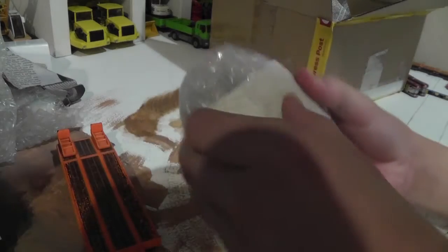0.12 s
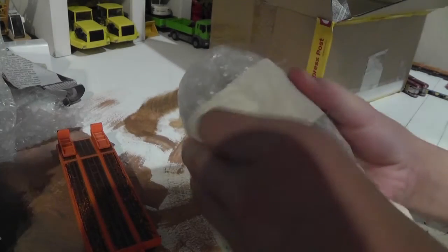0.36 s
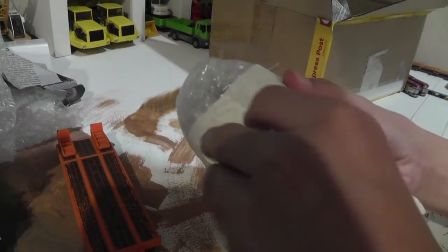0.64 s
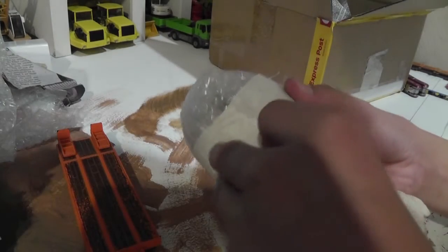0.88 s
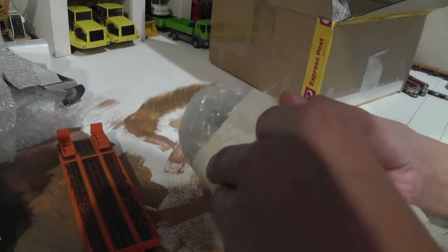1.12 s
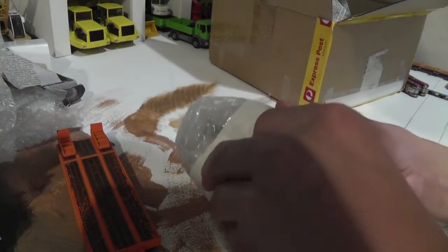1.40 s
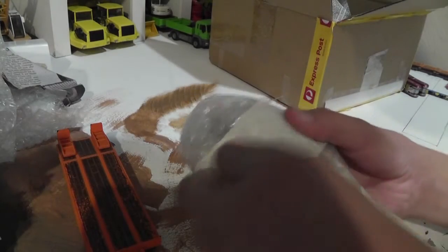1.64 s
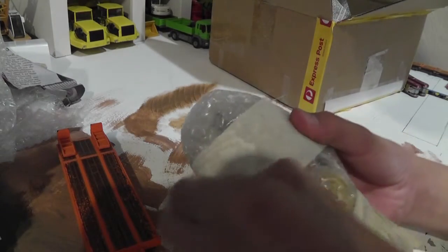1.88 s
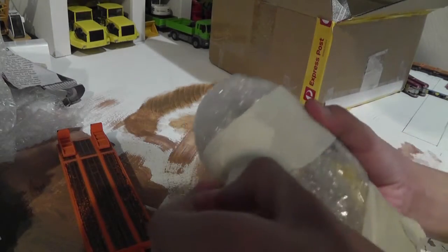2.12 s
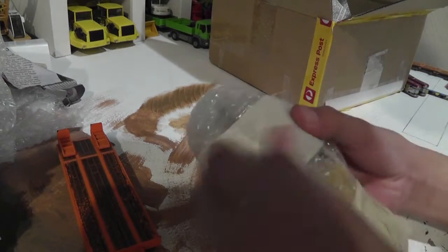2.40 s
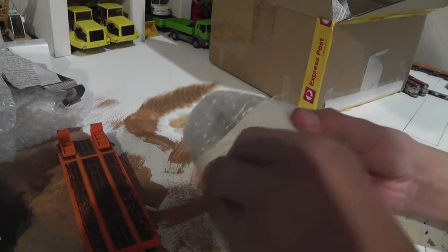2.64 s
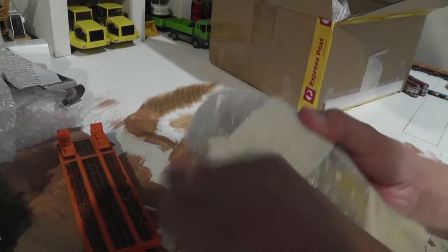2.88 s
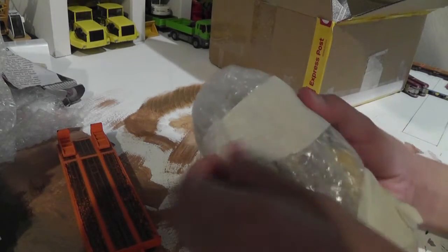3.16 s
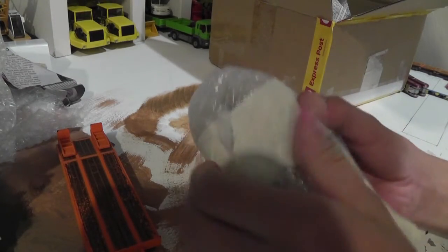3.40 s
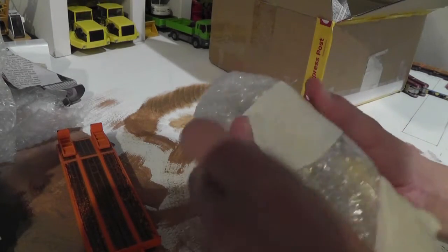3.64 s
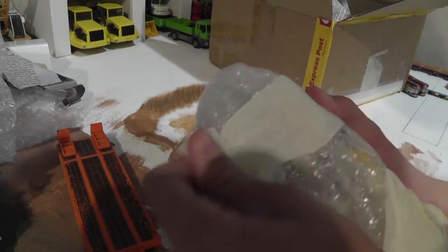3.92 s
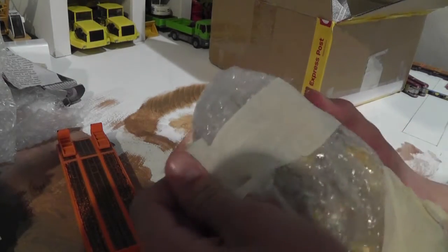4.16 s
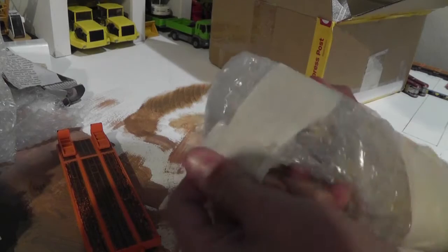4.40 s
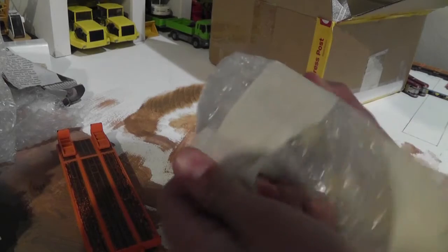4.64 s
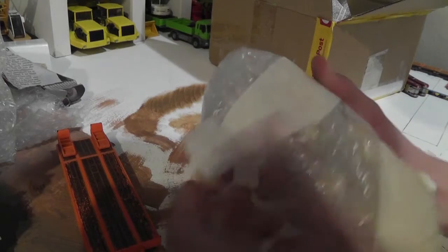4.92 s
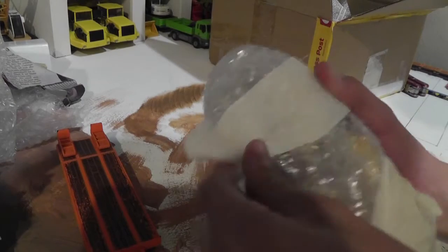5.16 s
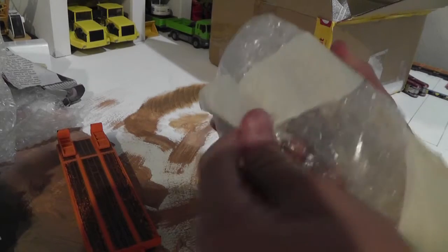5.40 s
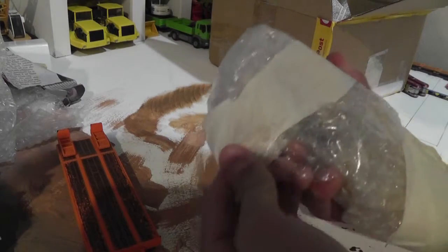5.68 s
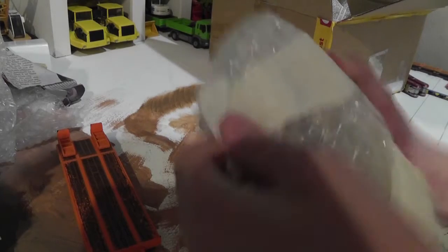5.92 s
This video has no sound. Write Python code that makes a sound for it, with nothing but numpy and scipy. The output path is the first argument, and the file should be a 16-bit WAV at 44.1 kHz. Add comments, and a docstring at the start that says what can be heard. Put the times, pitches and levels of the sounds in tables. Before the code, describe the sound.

A small parcel of bubble wrap and paper tape is worked by hands very close to a stereo microphone. Soft rustling and scattered ticks come first, then a sharp burst before two seconds. From there, crackles, creaks and snaps come thick and irregular to the end, with occasional hollow knocks and small air thuds. A quiet indoor room hums faintly behind, with short, dull reflections.

```python
"""A small parcel of bubble wrap and paper tape, twisted and pulled by hands close to a stereo microphone.
Film and tape are swarms of tiny noise bursts that swell with each twist: rustle, crackle and creak.
Larger folds snap in runs of three cracks, the hollow of the parcel knocks as a short low ring, and the
biggest snaps push a puff of air at the microphone. Short echoes surround the cracks, over a quiet
room's hum of shaped noise with a narrow hiss."""
import sys
import numpy as np
from scipy import signal
from scipy.io import wavfile
from scipy.ndimage import uniform_filter1d

SR = 44100
rng = np.random.default_rng(int(sys.argv[2]) if len(sys.argv) > 2 else 0)


def digitize_waveform(pressure):
    """Quantize a signal to 16-bit integers and store it at the path in sys.argv[1].

    Rows of a 2-D input are taken as channels; values are limited to [-1, 1].
    """
    field = np.atleast_2d(pressure).T
    bounded = np.clip(field, -1, 1)
    quanta = np.round(bounded * 32767).astype(np.int16)
    wavfile.write(sys.argv[1], SR, quanta)


def gain_from_db(level_db):
    """Turn a decibel level (scalar or array-like) into a linear amplitude factor."""
    decades = np.asarray(level_db, float) / 20
    return 10 ** decades


N = 266805

# stereo spread, before each source's own placing: (frequency [Hz], side against mid [dB])
WIDTH = [(60, 4), (250, -1), (400, -7), (560, -4), (800, -8.5), (1200, -8), (2400, -11.5), (4200, -17),
         (6500, -17), (9000, -9.5), (15000, -5.5)]
# tone of the film, rustling or crackling: (frequency [Hz], relative level [dB per Hz])
FILM_TONE = [(300, -16.5), (1200, -15), (2200, -1), (4000, -3.5), (6200, -1.5), (9000, -7.5),
             (15000, -15.5)]
# half-octave bands [Hz]
EDGES = 30 * 2 ** np.arange(0, 9.6, .5)
CENTRES = np.sqrt(EDGES[1:] * EDGES[:-1])


def at_hz(points, hz):
    """A spectrum read on a log-frequency axis."""
    table_hz, table_db = np.transpose(points)
    return np.interp(np.log(hz), np.log(table_hz), table_db)


def drift(rate_hz):
    """Slow chance of spread 1: coarse noise through a double one-pole low-pass."""
    r = np.exp(-80 * np.pi * rate_hz / SR)   # one step lasts 40 samples
    slow = signal.lfilter([1], [1, -2 * r, r * r], rng.standard_normal(N // 40 + 2002))[2000:]
    return np.interp(np.arange(N) / 40, np.arange(len(slow)), slow / slow.std())


def band(x, low_hz, high_hz):
    """Band-pass."""
    sos = signal.butter(2, [low_hz, min(high_hz, .45 * SR)], "band", fs=SR, output="sos")
    return signal.sosfilt(sos, x)


def high_pass(x, hz):
    """Takes away what lies below hz."""
    return signal.sosfilt(signal.butter(2, hz, "high", fs=SR, output="sos"), x)


def hum(patchy_db=1.5, wide_db=1.5):
    """Quiet room noise, wider than the near sounds, with a narrow hiss in it; mid and side."""
    # tone of the room: (frequency [Hz], relative level [dB per Hz])
    hum_tone = [(30, -26), (60, -19), (105, 3), (160, -9.5), (220, 5.5), (500, -2.5), (1200, -4),
                (2150, -3.5), (4000, -17), (15000, -24)]
    hum_db, hiss_db, hiss_hz, hiss_width_hz = -55, -66, 2160, 260
    murmur, white = 0, rng.standard_normal((2, 2, N))
    for k, hz in enumerate(CENTRES):
        gain = gain_from_db(at_hz(hum_tone, hz) + patchy_db * drift(2.9))
        spread = gain_from_db([[0], [at_hz(WIDTH, hz) + wide_db]])
        murmur = murmur + gain * band(white[k % 2], EDGES[k], EDGES[k + 1]) * spread
    hiss = band(rng.standard_normal((2, N)), hiss_hz - hiss_width_hz / 2, hiss_hz + hiss_width_hz / 2)
    hiss_gain = gain_from_db(hiss_db + patchy_db * drift(3.8))
    hiss = hiss_gain * hiss / hiss.std() * gain_from_db([[0], [-7.0]])
    return gain_from_db(hum_db) * murmur / murmur[0].std() + hiss


def hands():
    """Each twist swells and dies along a rounded shape in dB, adding in power: film dB, tape dB in time."""
    # twists and pulls, levels before each swarm's gain:
    # (time of height [s], film level [dB], tape and paper level [dB], rise [s], fall [s])
    twists = [(0.029, -41.5, -38, 0.13, 0.019), (0.14, -43, -49.5, 0.22, 0.3),
              (0.327, -34, -37, 0.093, 0.17), (0.64, -44, -49, 0.062, 0.4), (0.8, -45.5, -68, 0.3, 0.09),
              (1.11, -55, -50, 0.4, 0.13), (1.269, -55, -52, 0.14, 0.062), (1.52, -49.5, -58, 0.045, .2),
              (1.64, -42, -52, 0.096, 0.064), (1.703, -23, -28, 0.0098, 0.069),
              (1.9, -38.5, -43.5, 0.16, 0.44), (1.993, -26.5, -29.5, 0.016, 0.072),
              (2.131, -34, -58, 0.035, 0.11), (2.203, -36.5, -38.5, 0.099, 0.055),
              (2.334, -41, -48.5, 0.045, 0.086), (2.399, -41, -39.5, 0.03, 0.15),
              (2.572, -40, -40.5, 0.014, 0.14), (2.809, -40, -41.5, 0.07, 0.059),
              (2.873, -22.5, -30, 0.023, 0.03), (2.946, -28.5, -36, 0.11, 0.044),
              (3.02, -36.5, -49.5, 0.21, 0.1), (3.105, -35.5, -43.5, 0.013, 0.046),
              (3.149, -42, -43.5, 0.019, 0.013), (3.276, -39, -43.5, 0.085, 0.069),
              (3.364, -41, -37.5, 0.022, 0.038), (3.461, -44, -47, 0.067, 0.032),
              (3.605, -36, -40.5, 0.01, 0.13), (3.695, -31.5, -35, 0.056, 0.046),
              (3.84, -33.5, -45, 0.06, 0.085), (3.866, -22.5, -28.5, 0.008, 0.011),
              (3.901, -37, -50.5, 0.069, 0.058), (4.018, -28.5, -39, 0.093, 0.067),
              (4.223, -41, -54, 0.24, 0.18), (4.32, -29, -39, 0.011, 0.047), (4.4, -34, -40.5, 0.05, 0.16),
              (4.53, -33, -48, 0.14, 0.072), (4.751, -34, -46, 0.18, 0.16),
              (4.908, -39.5, -38.5, 0.099, 0.079), (5.142, -30.5, -35.5, 0.012, 0.037),
              (5.199, -28.5, -30.5, 0.02, 0.098), (5.239, -26.5, -21.5, 0.038, 0.027),
              (5.33, -42, -55, 0.17, 0.18), (5.52, -33.5, -47, 0.27, 0.11),
              (5.581, -34.5, -61, 0.076, 0.071), (5.671, -39, -53, 0.025, 0.075),
              (5.738, -41, -50.5, 0.031, 0.096), (5.908, -34, -43.5, 0.046, 0.13),
              (6.0, -23, -32, 0.026, 0.012), (6.04, -43, -43, .05, .2)]
    rest_film_db, rest_tape_db = -65.5, -86   # the parcel merely held
    span_db = 15       # climbed in the rise time, dropped in the fall time
    roundness = 1.27   # power of time: over 1 gives a rounded top and steep flanks
    t = np.arange(0, N + 64, 64) / SR
    s, film_db, tape_db, rise, fall = np.transpose(twists)[..., None]
    before = (s - t) / np.maximum(rise, .005)
    after = (t - s) / np.maximum(fall, .005)
    shape = -span_db * np.where(t < s, before, after) ** roundness
    efforts = []
    for db, rest_db in ((film_db, rest_film_db), (tape_db, rest_tape_db)):
        power = gain_from_db(rest_db) ** 2 + np.sum(gain_from_db(db + shape) ** 2, axis=0)
        efforts.append(np.interp(np.arange(N) / SR, t, 10 * np.log10(power)))
    return efforts


def colours(count, spread_db):
    """Every crack has a tone of its own: neighbouring bands rise and fall together."""
    chance = uniform_filter1d(rng.standard_normal((count, len(CENTRES))), size=3, axis=1)
    return spread_db * np.sqrt(3) * chance


def swarm(per_s, clump_db, clump_hz, size_db, level_db, colour_db):
    """Cracks at random moments, in clumps, a few much larger than most: (sample, dB per band)."""
    fold = int(.015 * SR)   # samples that one fold keeps crinkling
    busy = per_s * gain_from_db(clump_db * drift(clump_hz))
    at = np.flatnonzero(rng.random(N) < busy / SR)
    size = level_db[at] + size_db * np.minimum(rng.exponential(1, len(at)), 3.5)
    # cracks of one moment come from one fold and share a tone
    shared = colours(N // fold + 1, 2.5)[at // fold]
    return at, size[:, None] + colours(len(at), colour_db) + shared


def film_rustle(film_db):
    """Palms slide on the film: a dense swarm whose treble brightens with effort."""
    tilt = 0.09   # dB per octave above 6 kHz, for each dB of effort over the mean
    at, levels = swarm(7000, 1.5, 29.0, 1.73, film_db + 3.5, colour_db=2.5)
    effort = film_db[at, None] - film_db.mean()
    brighter = tilt * effort * np.maximum(np.log2(CENTRES / 6000), 0)
    return at, levels + brighter + at_hz(FILM_TONE, CENTRES)


def film_crackle(film_db):
    """Single cells buckle: a sparser swarm that still ticks while the hands rest."""
    follows = 0.74   # share of the film's swing in dB
    level_db = film_db.mean() + follows * (film_db - film_db.mean()) + 8.0
    at, levels = swarm(500, 3.0, 30.0, 3.2, level_db, colour_db=4.5)
    return at, levels + at_hz(FILM_TONE, CENTRES)


def body_tone(at):
    """The parcel's hollow ring at each sample: dB per band, falling away on both sides of its pitch."""
    # the hollow changes with the grip: (time [s], pitch [Hz])
    hollow = [(0.0, 750), (0.32, 640), (1.71, 630), (2.0, 580), (2.2, 1210), (2.39, 436), (2.6, 645),
              (2.85, 660), (3.05, 900), (3.68, 494), (4.02, 866), (4.35, 1500), (4.5, 1930), (4.9, 840),
              (5.14, 460), (5.21, 815), (5.9, 1600), (6.0, 880)]
    below_db, above_db = 2.5, 5.0   # fall per octave squared
    s, hz = np.transpose(hollow)
    octaves = np.log2(CENTRES / np.interp(at / SR, s, hz)[:, None])
    return -np.where(octaves < 0, below_db, above_db) * octaves ** 2


def tape_creak(tape_db):
    """The tape's glue slips: a swarm coloured by the hollow of the parcel."""
    at, levels = swarm(3000, 2.0, 20.0, 1.8, tape_db + 14, colour_db=3.0)
    return at, levels + body_tone(at)


def snaps(gain_db=5.0, below_db=2.0, above_db=13.0, body_db=17.0, fade_db=12.5, cycles=4.3, reach_db=19.0):
    """A fold gives way in three cracks a few cycles apart: a broad peak at its pitch over the body tone."""
    # larger folds giving way, levels before gain_db and body_db:
    # (time [s], peak level [dB], pitch [Hz], body against peak [dB])
    folds = [(0.6277, -17.5, 5500, -19), (0.6355, -18.5, 5800, -19), (0.785, -21.5, 6560, -21),
             (0.84, -25, 8100, -23), (0.879, -29, 7750, -29), (1.027, -21.5, 5950, -30),
             (1.0921, -25.5, 5460, -0.5), (1.185, -29.5, 6500, -27), (1.279, -38, 6500, -20),
             (1.296, -30.5, 2840, -22), (1.5, -29.5, 7460, -23), (1.536, -26, 7400, -29),
             (1.5698, -16.5, 6450, -21), (1.5745, -14, 5700, -24), (1.6997, -7.5, 5400, -3),
             (1.706, -12, 7000, -11), (1.742, -5, 3440, -25), (1.881, -10, 4900, -15),
             (1.967, -14, 6000, -5), (1.9898, -1.5, 4630, -16.5), (1.996, -5, 5570, -18),
             (2.1255, -15, 5900, -25), (2.2013, -1.5, 8500, -21.5), (2.2317, -18, 4950, -9.5),
             (2.3046, -26, 6660, -24), (2.3395, -20, 7200, -36), (2.365, -15.5, 6800, -26),
             (2.3913, -6.5, 4510, -8), (2.4583, -17, 8600, -4), (2.507, -27, 7740, -12),
             (2.664, -29, 7540, -20), (2.773, -22.5, 8500, -21), (2.82, -24, 6690, -15),
             (2.8394, -6.5, 5650, -7), (2.8514, -4.5, 5200, -9.5), (2.8575, -8.5, 6000, -1),
             (2.876, -7, 5900, -27), (2.8788, -12, 2980, -15), (2.9087, -11, 5830, -10.5),
             (2.9284, -5, 6360, -18), (2.9488, -2.5, 5100, -32), (2.959, -11, 8000, -17),
             (2.985, -12, 5760, -8.5), (2.9917, -9, 9550, -30), (2.9978, -6, 9560, -23),
             (3.0074, -12.5, 8060, -17), (3.0537, -11, 4360, -14.5), (3.1006, -14.5, 7040, -9),
             (3.1543, -15, 10800, -16), (3.3632, -22.5, 7760, -11), (3.3654, -9.5, 3600, -18),
             (3.51, -28, 6800, -30), (3.8595, -1.5, 2640, -16.5), (3.8674, -5, 5740, -8.5),
             (3.986, -7, 7950, -25), (4.0179, -5.5, 3360, -34), (4.032, -4, 6950, -20),
             (4.0433, -7.5, 6500, -23), (4.0681, -12, 6070, -12), (4.1491, -25, 11080, -17),
             (4.303, -19, 6250, -28), (4.3154, -16, 7500, -28), (4.3209, -11.5, 6340, -33),
             (4.329, -20, 4020, -20), (4.3497, -13, 6000, -18), (4.3525, -6, 6160, -2.5),
             (4.381, -14.5, 2470, -6), (4.4512, -27, 9000, -30), (4.4934, -10, 2120, -21),
             (4.5123, -18, 6900, -30), (4.518, -15.5, 1980, -11), (4.5603, -13, 6550, -34),
             (4.5672, -7, 7000, -15), (4.717, -22, 1300, -20), (4.7458, -12, 6840, -37),
             (4.8141, -15.5, 6200, -33), (4.8927, -14, 7500, -30), (4.8941, -1, 2010, -10),
             (4.8961, -6, 6900, -20), (5.022, -25.5, 9540, -16), (5.0715, -27.5, 5500, -4),
             (5.1406, -11.5, 4700, -18), (5.266, -13, 5050, -21), (5.3102, -19, 7000, -17),
             (5.503, -17, 8000, -28), (5.508, -11, 9000, -21), (5.5378, -6, 5960, -24),
             (5.554, -5.5, 6230, -15), (5.579, -6.5, 6030, -24), (5.581, -4.5, 5330, -18),
             (5.616, -15, 4970, -31), (5.6644, -8.5, 3520, -9.5), (5.7338, -16, 5900, -12.5),
             (5.78, -25, 6960, -23), (5.8074, -23.5, 6100, -30), (5.86, -23, 7700, -27),
             (5.8977, -15, 4060, -12), (5.9208, -8, 3200, -10.5), (5.9962, -7.5, 4740, -1.5),
             (6.009, -6, 6300, -7)]
    s, peak, pitch, body = np.transpose(folds)[..., None]
    octaves = np.log2(CENTRES / pitch)
    narrow = 10 * np.log10(6000 / pitch)   # a low peak spans fewer Hz, so each holds more
    slope_up = np.minimum(above_db * octaves ** 2, reach_db)
    bright = peak + gain_db + narrow - np.where(octaves < 0, below_db * octaves ** 2, slope_up)
    dull = peak + body + body_db + body_tone(s[:, 0] * SR)
    tone = 10 * np.log10(gain_from_db(bright) ** 2 + gain_from_db(dull) ** 2)
    steps = np.arange(3)
    late = cycles / pitch * steps * rng.uniform(0.65, 2.2, (len(s), 3))
    at = np.clip(((s + late) * SR).astype(int), 0, N - 1)
    uneven = rng.normal(0, 1.5, (len(s), 3, len(CENTRES)))
    levels = tone[:, None] - fade_db * steps[:, None] + uneven
    return at.ravel(), levels.reshape(-1, len(CENTRES))


def crack_sound(at, levels_db):
    """A noise burst dies within a millisecond and leaves the sheet shivering faintly; mid and side."""
    crack_ms, ring_ms, ring_db = .2, 5.0, -25   # two decay time constants, and the slow one's level
    lean, scatter = -.33, .95                   # a little right of centre on average
    out, white = np.zeros((2, N)), rng.choice([-1., 1.], (2, N))
    place = lean + scatter * rng.standard_normal(len(at))
    sign = rng.choice([-1., 1.], len(at))   # random, so that dense bursts do not pile up
    fall, linger = np.exp(-1000 / (np.array([crack_ms, ring_ms]) * SR))
    shiver = gain_from_db(ring_db)
    for k, hz in enumerate(CENTRES):
        size = sign * gain_from_db(levels_db[:, k])
        mid = np.bincount(at, size, N)
        side = np.bincount(at, size * place * gain_from_db(at_hz(WIDTH, hz)), N)
        # the sum of a fast and a slow decay, as one filter
        top, bottom = [1 + shiver, -linger - shiver * fall], np.poly([fall, linger])
        bursts = signal.lfilter(top, bottom, np.array([mid, side]) + 1e-12)
        out += band(bursts * white[k % 2], EDGES[k], EDGES[k + 1])
    return out


def room(x):
    """Five feedback delays for mid and five for side, duller on every round, stepped block by block."""
    t60_s, wall_cut_hz = 0.15, 1200
    out, dull = np.zeros((2, N)), np.exp(-2 * np.pi * wall_cut_hz / SR)
    lags = (rng.uniform(0.008, .022, 10) * SR).astype(int)
    for k, lag in enumerate(lags):
        loop, gain, state = x.copy(), gain_from_db(-60 * lag / SR / t60_s), [0.]
        for i in range(lag, N, lag):
            back, state = signal.lfilter([gain * (1 - dull)], [1, -dull], loop[i - lag:i], zi=state)
            loop[i:i + lag] += back[:N - i]
        out[k % 2] += (loop - x) * (-1) ** (k // 2)
    return out


def knocks():
    """A knuckle or fold knocks the parcel's hollow: a low ring of a few cycles, a little to the right."""
    # knocks, before the high-pass: (time [s], level [dB], pitch [Hz])
    knock_table = [(1.701, -21, 229), (1.74, -36, 201), (2.3926, -9, 424), (2.3922, -15, 800),
                   (4.897, -19, 430), (5.133, -27, 394)]
    die_cycles = 9.1   # to die away by 60 dB
    out, t = np.zeros(N + SR), np.arange(SR // 10) / SR
    for s, db, hz in knock_table:
        at = int(s * SR)
        out[at:at + len(t)] += gain_from_db(db - 60 * t * hz / die_cycles) * np.sin(2 * np.pi * hz * t)
    return high_pass(out, 170)[:N] * gain_from_db([[0], [-6.0]]) * [[1], [-1]]


def air_pushes(gain_db=14.0, hz=120, width_hz=170):
    """The puff from a big snap swings the ports opposite ways for one cycle, right harder; mid and side."""
    # puffs of air, before gain_db: (time [s], level [dB])
    puffs = [(1.99, -23), (2.202, -25.5), (2.84, -25.5), (3.861, -21), (4.017, -22), (4.352, -35),
             (4.895, -26), (5.553, -23), (5.579, -29), (5.997, -27)]
    alike, lag_ms = .55, 1.2   # share of the puff felt alike at both ports, and its delay
    s, push_db = np.transpose(puffs)
    clicks = np.bincount((s * SR).astype(int), gain_from_db(push_db + gain_db), N)
    r, w = np.exp(-np.pi * width_hz / SR), 2 * np.pi * hz / SR
    thud = signal.lfilter([0, np.sin(w)], [1, -2 * r * np.cos(w), r * r], clicks + 1e-18)
    thud = high_pass(thud, 45)
    return np.array([-alike * np.roll(thud, int(lag_ms * SR / 1000)), thud])


def scene():
    """All cracks share one way of sounding; mid and side become left and right."""
    film_db, tape_db = hands()
    swarms = [film_rustle(film_db), film_crackle(film_db), tape_creak(tape_db), snaps()]
    at = np.concatenate([moments for moments, _ in swarms])
    levels_db = np.concatenate([levels for _, levels in swarms])
    parcel = crack_sound(at, levels_db)
    echo = gain_from_db(-17) * room(parcel[0]) * gain_from_db([[0], [-9.0]])   # narrower: side 9 dB down
    mid, side = parcel + echo + air_pushes() + knocks() + hum()
    return np.array([mid + side, mid - side])


def roll_off(x):
    """The treble ends steeply here."""
    return signal.sosfilt(signal.butter(12, 16960, fs=SR, output="sos"), x)


def record(dry):
    """The recorder's notch filters, a broad dip and a bump colour the sound; its highest peaks are rounded."""
    # the recorder's notch filters, a broad dip and a bump: (frequency [Hz], width [Hz], gain [dB])
    notches = [(1785, 228, -8.5), (2167, 370, 5), (2343, 205, -14.5), (3071, 53, -19.5), (4610, 1100, -3.5)]
    for hz, width_hz, db in notches:
        w, g = 2 * np.pi * hz / SR, gain_from_db(db / 2)
        a = np.sin(w) * width_hz / hz / 2
        top = [1 + a * g, -2 * np.cos(w), 1 - a * g]
        bottom = [1 + a / g, -2 * np.cos(w), 1 - a / g]
        dry = signal.lfilter(top, bottom, dry)
    rounded = .7 * np.tanh(dry / .7)
    # a steep low-pass leaves next to nothing above 15.8 kHz
    mix = signal.sosfilt(signal.ellip(10, .5, 60, 15800, fs=SR, output="sos"), rounded)
    return roll_off(mix)


dry = scene()
out = record(dry)
digitize_waveform(out)
```